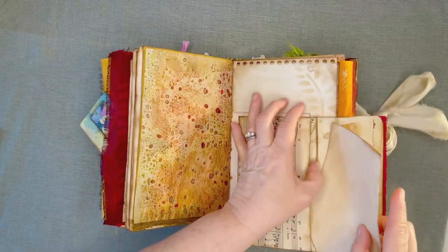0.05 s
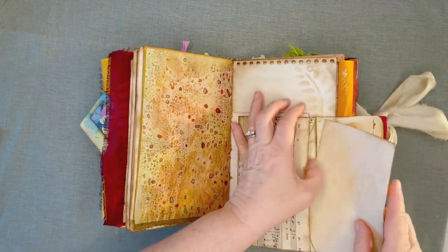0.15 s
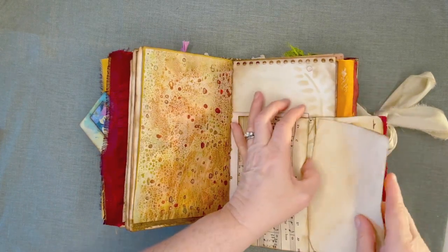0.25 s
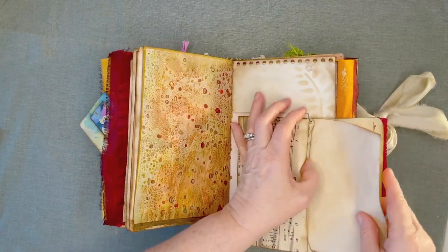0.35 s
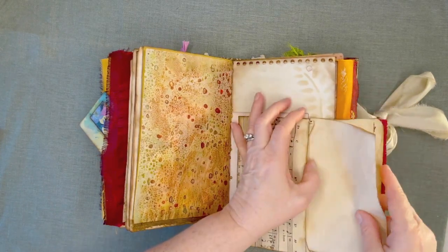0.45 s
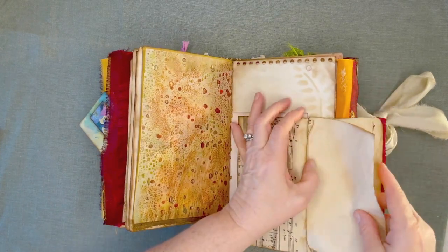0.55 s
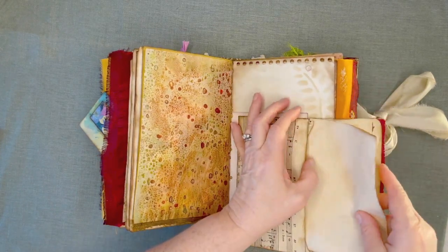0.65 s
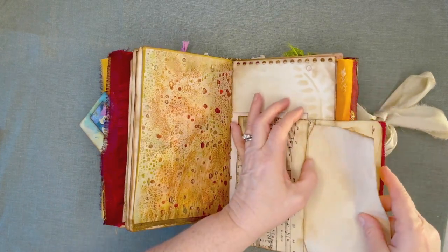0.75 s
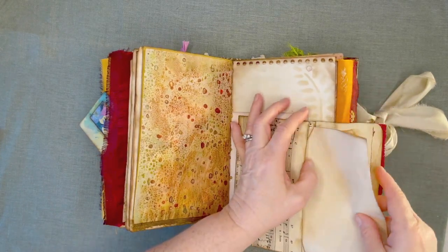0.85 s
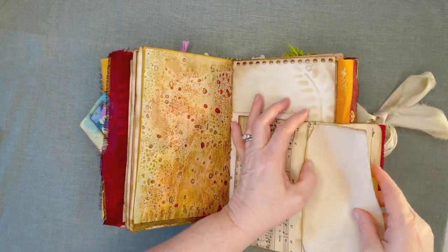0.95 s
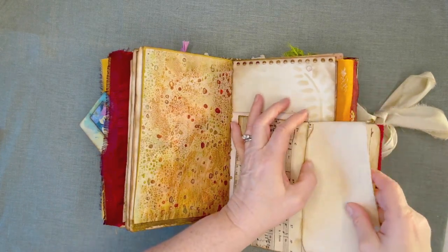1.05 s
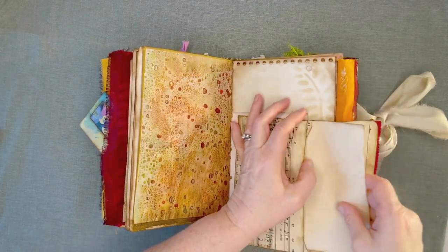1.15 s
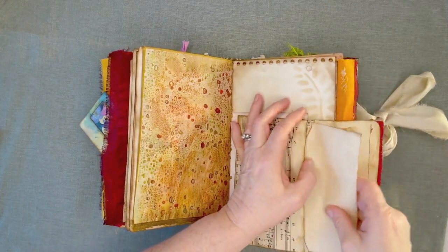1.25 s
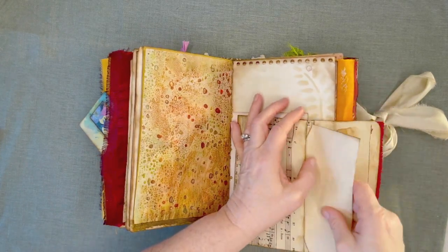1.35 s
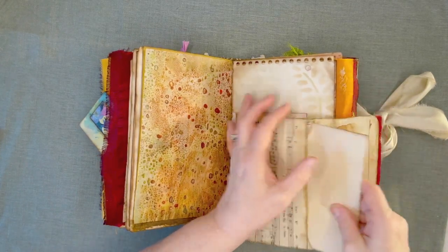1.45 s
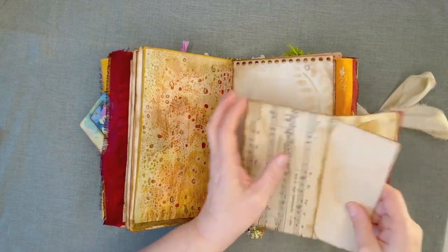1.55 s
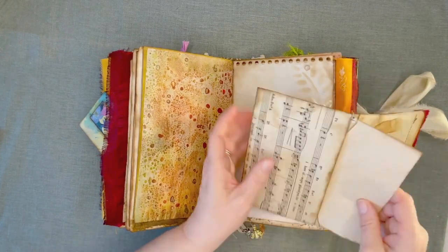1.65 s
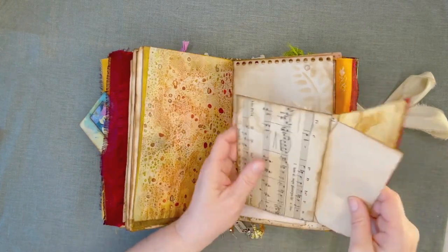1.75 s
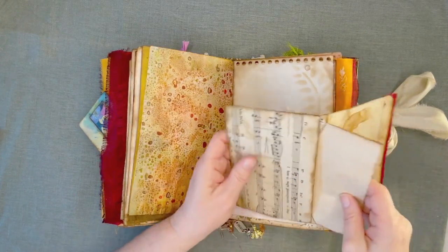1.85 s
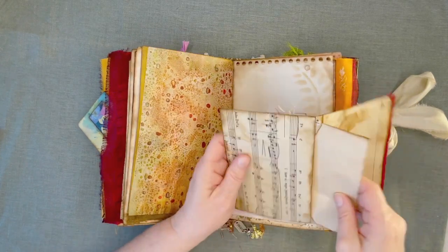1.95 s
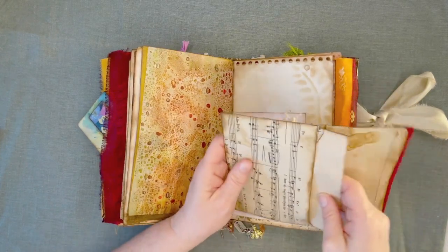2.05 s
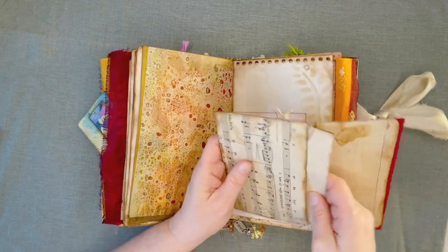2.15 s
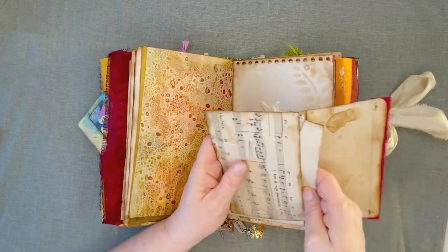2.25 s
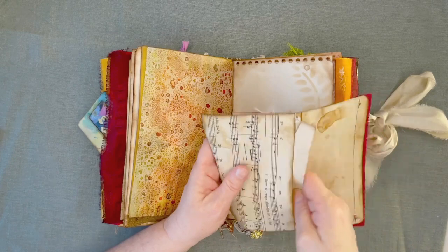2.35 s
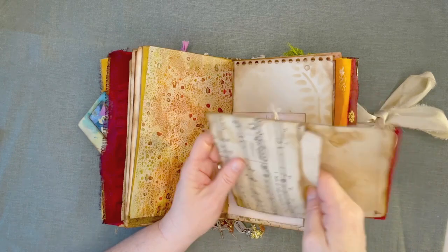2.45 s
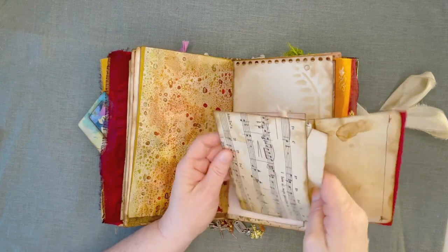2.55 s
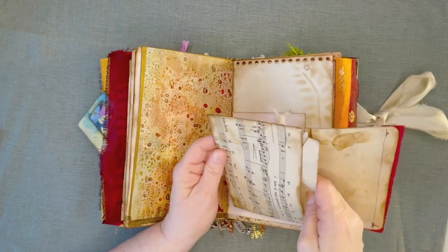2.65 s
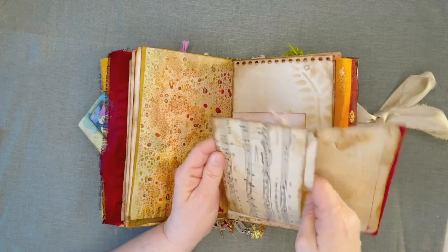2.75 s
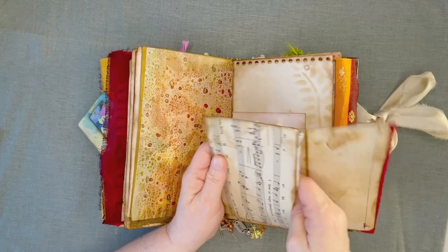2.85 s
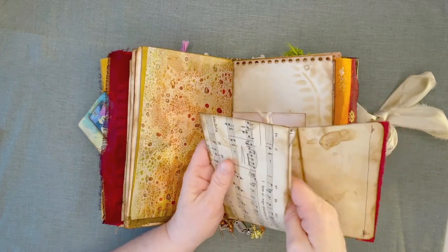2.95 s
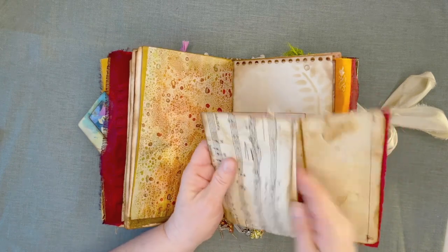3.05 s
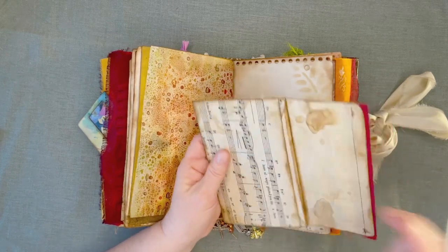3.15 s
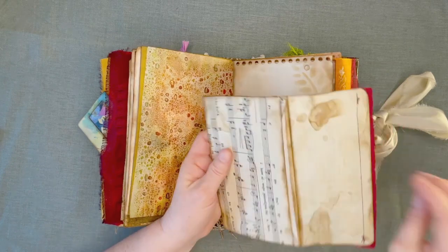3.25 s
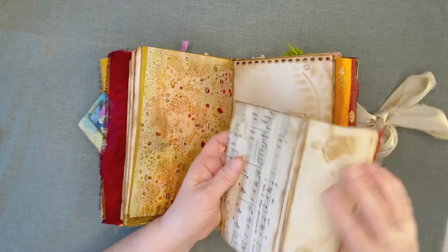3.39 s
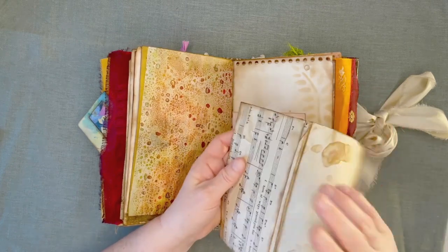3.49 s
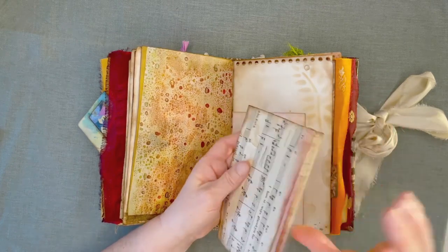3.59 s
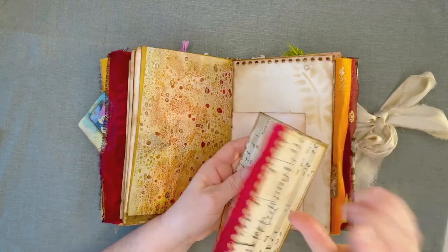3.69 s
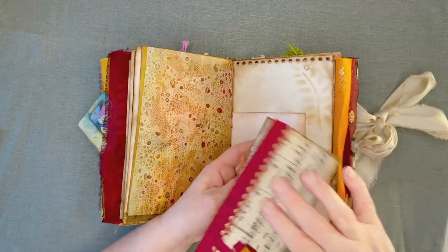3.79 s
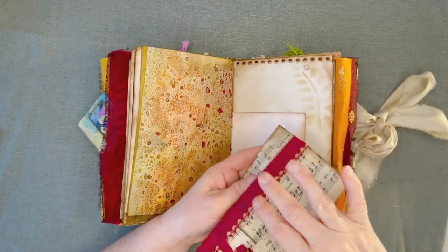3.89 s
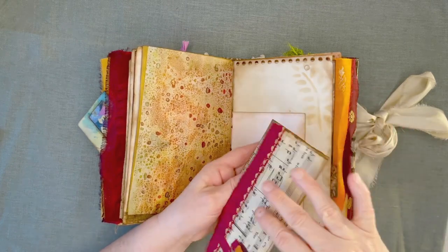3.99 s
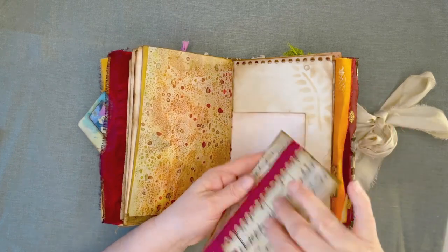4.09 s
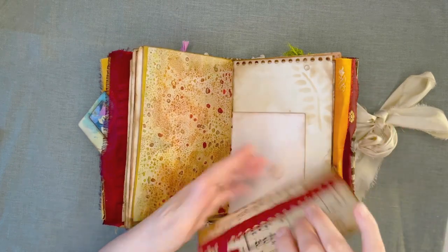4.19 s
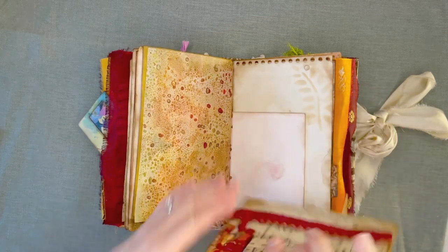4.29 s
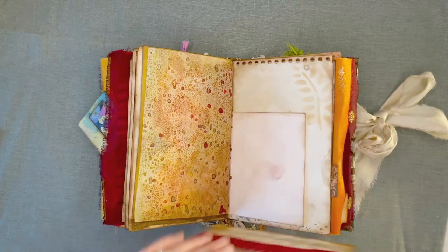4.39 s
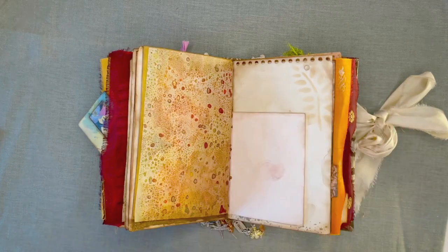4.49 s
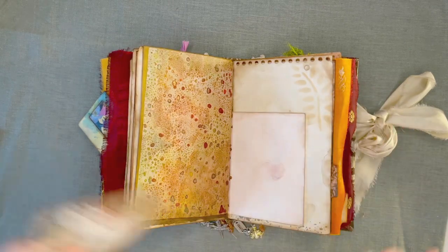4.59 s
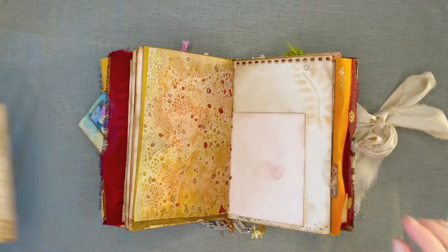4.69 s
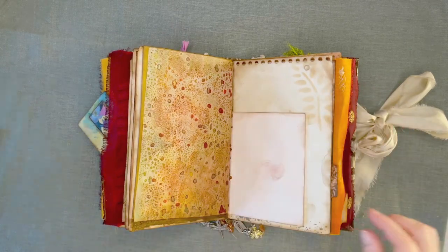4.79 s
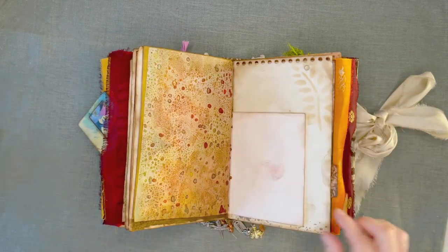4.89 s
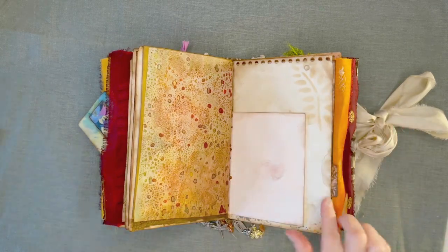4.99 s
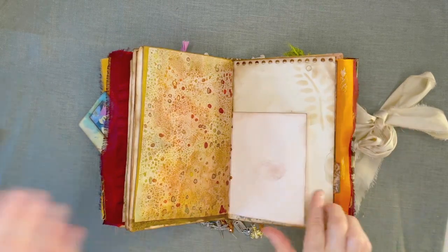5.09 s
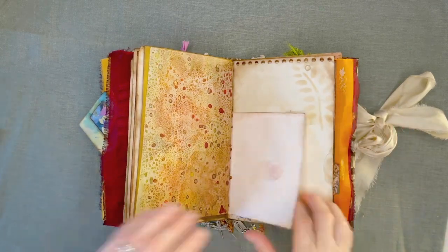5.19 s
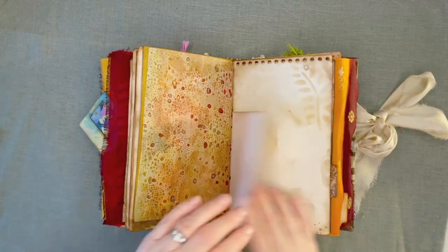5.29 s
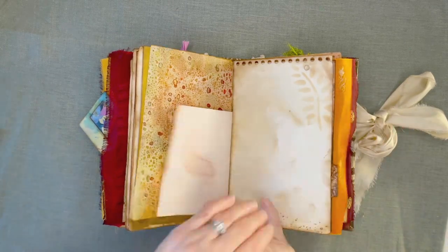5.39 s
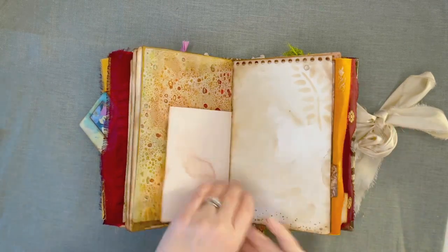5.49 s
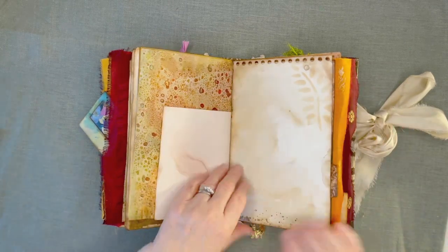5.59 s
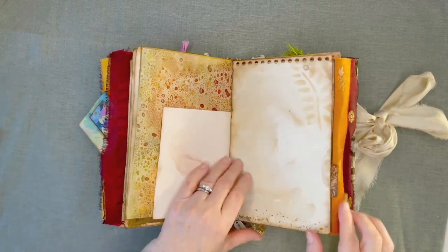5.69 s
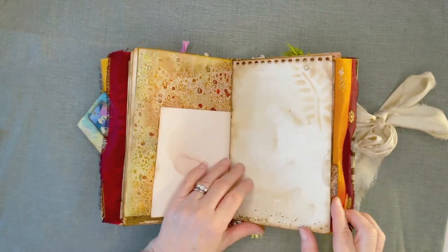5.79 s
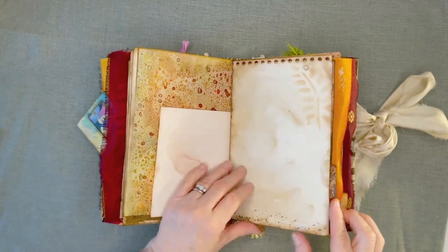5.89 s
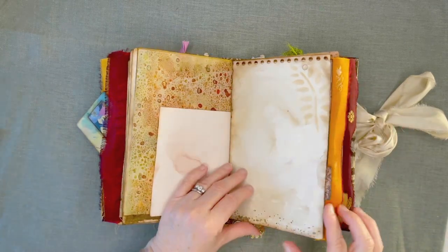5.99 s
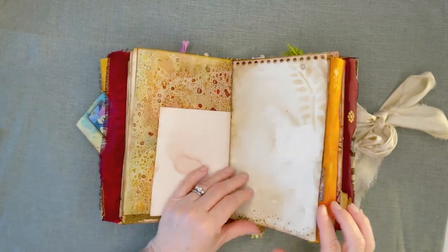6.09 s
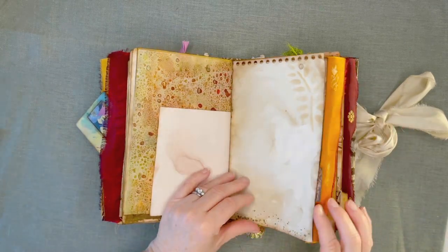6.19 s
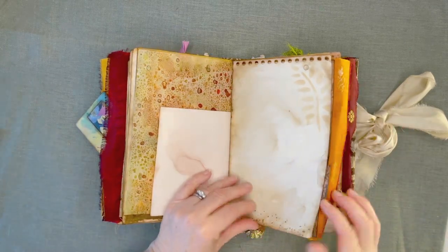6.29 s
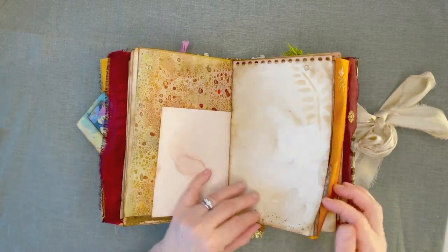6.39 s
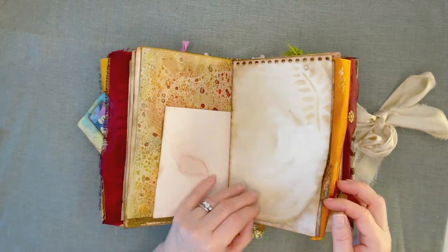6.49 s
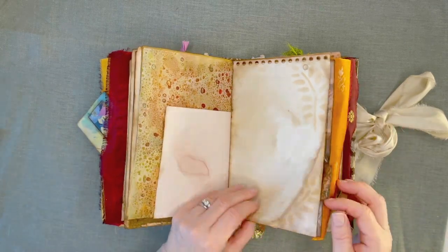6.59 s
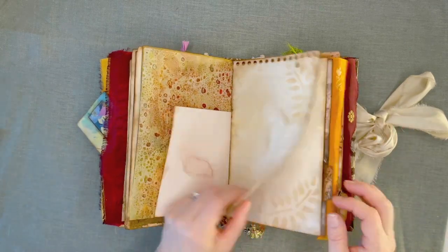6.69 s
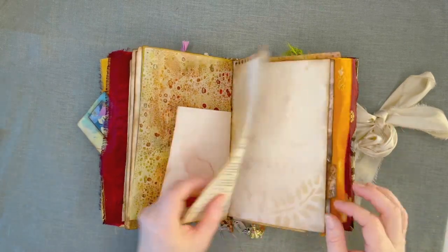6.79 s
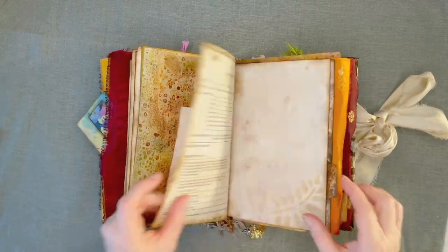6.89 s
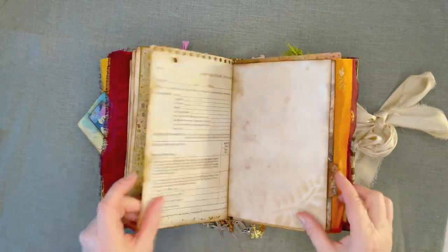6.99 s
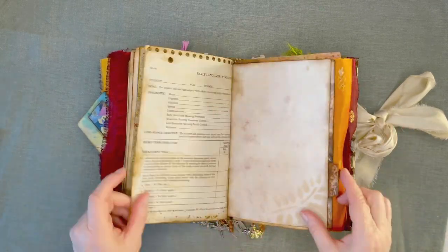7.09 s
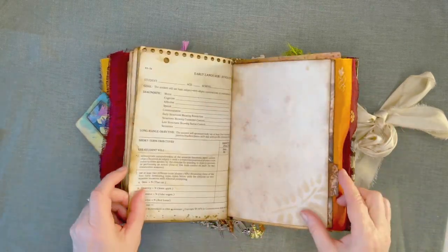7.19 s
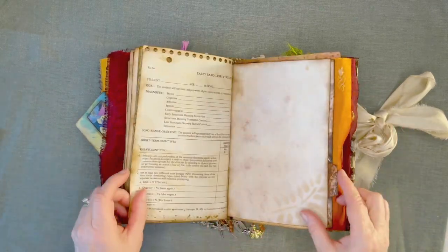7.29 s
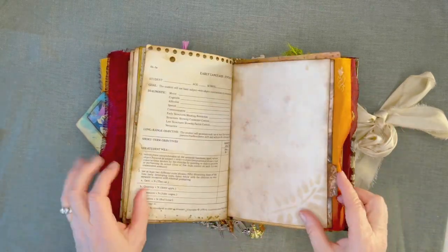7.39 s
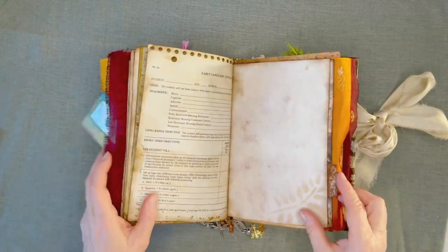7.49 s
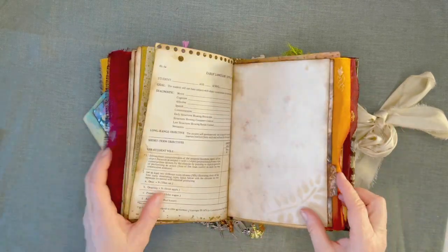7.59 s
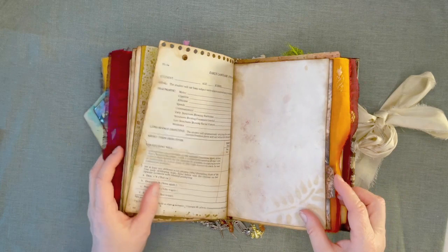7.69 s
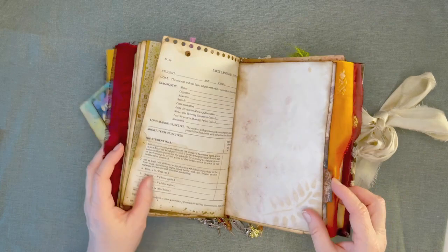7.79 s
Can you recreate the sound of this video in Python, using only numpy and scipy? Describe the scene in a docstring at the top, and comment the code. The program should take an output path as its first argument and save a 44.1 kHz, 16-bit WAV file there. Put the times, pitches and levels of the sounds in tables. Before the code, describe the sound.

From the start, a loose card slides against a paper pocket with an uneven hiss, dotted with soft finger knocks and a few dry snaps. From about 1.9 to 3 seconds the tugging gets louder and busier, with quick rasping strokes, crinkles and low bumps against the book; the brightest scrape comes near 2.8 seconds. Between 3 and 4 seconds a small paper folder is folded with hollow taps and crease snaps, followed by quieter brushing as it is put aside. A journal page turns at about 5.3 seconds and lands with a sharp snap and soft thud near 5.5. A second page turns in a longer swish from about 6.4 to 7 seconds, with dull knocks. Light rubs and clicks continue until about 7.8. Everything is close and in stereo, in a small, damped room with a faint mains hum.

```python
"""First comes the hiss of a loose card being tugged out of a paper pocket. Hands then fold the little
folder away and turn two journal pages. Paper rubbing on paper hisses, rasps and drums on the sheets;
fingers knock softly, edges and creases let go in short snaps, and the book rumbles and thuds.
A close stereo microphone hears it all in a small, damped room with a faint mains hum."""
import sys
import numpy as np
from scipy import signal
from scipy.fft import rfft, irfft, next_fast_len
from scipy.io import wavfile
from scipy.ndimage import uniform_filter1d, map_coordinates

SR = 44100
rng = np.random.default_rng(int(sys.argv[2]) if len(sys.argv) > 2 else 0)


def pcm_store(signal):
    """Save signal as 16-bit PCM."""
    levels = np.round(np.clip(np.atleast_2d(signal), -1, 1) * 32767)
    wavfile.write(sys.argv[1], SR, levels.astype(np.int16).T)


N = 346185

# strokes of paper over paper: t/s of greatest speed, rise/s, fall/s, hiss level/dB, drumming level/dB
STROKES = [ (.03, 0.13, 0.15, -47.5, -54), (.23, 0.19, 0.12, -57.5, -57), (.33, 0.052, 0.043, -48.5, -55),
           (.48, 0.021, 0.049, -54, -49), (0.636, 0.061, 0.028, -47.5, -55), (1.0, 0.43, 0.56, -51, -57),
           (1.381, 0.025, 0.068, -44.5, -52.5), (1.661, 0.025, 0.048, -50, -59.5),
           (1.76, 0.04, 0.054, -49.5, -61), (1.929, 0.05, 0.091, -40, -49),
           (2.096, 0.059, 0.053, -39.5, -48), (2.234, 0.039, 0.068, -46, -54),
           (2.39, 0.068, 0.061, -46.5, -52), (2.52, 0.05, 0.035, -43.5, -47.5),
           (2.594, 0.025, 0.024, -41, -51.5), (2.7, 0.031, 0.034, -36.5, -54),
           (2.805, 0.085, 0.03, -35, -48), (2.9, 0.18, 0.069, -48, -62), (2.998, 0.05, 0.033, -40, -42),
           (3.06, .04, 0.13, -61, -55.5), (3.296, 0.028, 0.028, -45, -43), (3.377, 0.016, 0.02, -42, -49),
           (3.468, 0.038, 0.076, -50, -50), (3.73, 0.025, 0.098, -57.5, -54.5),
           (3.91, 0.095, 0.12, -58.5, -64), (4.054, 0.047, 0.052, -50.5, -63.5),
           (4.25, 0.18, 0.16, -57.5, -110), (4.374, 0.021, 0.039, -54.5, -57.5),
           (4.58, 0.077, 0.1, -54, -100), (4.789, 0.024, 0.067, -52.5, -65.5),
           (5.02, 0.083, 0.11, -59, -80), (5.099, 0.03, 0.11, -49.5, -69), (5.31, 0.075, 0.13, -49, -59),
           (5.465, 0.015, 0.047, -44.5, -48), (5.62, 0.18, 0.17, -54.5, -74.5),
           (5.89, 0.063, 0.088, -58, -61), (6.03, 0.02, 0.036, -54, -64), (6.28, 0.1, 0.44, -73, -61),
           (6.55, 0.42, 0.68, -50, -63.5), (6.859, 0.29, 0.12, -47.5, -67),
           (7.14, 0.038, 0.027, -51.5, -80), (7.274, 0.027, 0.025, -43.5, -58),
           (7.41, 0.082, 0.069, -52.5, -58.5), (7.6, 0.049, 0.13, -54, -55), (7.74, 0.2, 0.27, -56, -60.5)]
# the grip sets where the sheet and its rubbing edge ring: t/s, sheet f/Hz, edge f/Hz, edge boost/dB
GRIP = [(.1, 440, 3680, 6.5), (.9, 650, 3900, 7), (2.0, 620, 4030, 4), (2.5, 960, 3730, 4.5),
        (2.8, 2360, 3600, 8.5), (3.0, 885, 3120, 3), (3.42, 600, 1920, 5), (3.7, 1620, 1910, -4.5),
        (5.1, 2500, 3800, 6.5), (5.35, 1820, 3300, 4.5), (6.25, 368, 3170, 1), (6.85, 915, 6040, 1),
        (7.6, 980, 2570, 4)]
# tone colours of the bright hiss, the rough rasp and the low drumming: f/Hz, level/dB
HISS_COLOUR = [(2400, -9), (3700, -1), (7000, 3.5), (11000, 2), (12600, -9), (14500, -58)]
RASP_COLOUR = [(1300, -5.5), (1850, 0.5), (2800, -2.5), (4000, -9)]
DRUM_COLOUR = [(330, 1), (470, -1.5), (1080, -2), (1250, -7), (1900, -8.5)]
# hands pressing and shifting the book on the table: t/s, rumble level/dB
PRESSES = [(0.0, -68.5), (2.21, -73.5), (2.91, -85), (3.0, -73.5), (4.61, -87), (7.32, -72)]
# bumps against the block of pages: t/s, level/dB
BUMPS = [(1.48, -60), (2.0, -55), (2.12, -55), (3.02, -55), (3.754, -58.5), (4.04, -59.5), (4.375, -65),
         (5.461, -60), (6.92, -55), (7.421, -57.5)]
# tone colour of the quiet room: f/Hz, level/dB
AIR_COLOUR = [(60, 7), (130, -8), (300, -10.5), (10000, -20)]
# tone colour of one short contact with paper: f/Hz, level/dB
CONTACT_COLOUR = [(230, -0.5), (450, 0.5), (1080, 2), (1250, -3), (1850, 2.5), (3900, -1.5), (11000, -7),
                  (14500, -37)]
# fingers and card knocking on the sheets: t/s, level/dB, ring f/Hz
KNOCKS = [(0.37, -41.5, 480.0), (0.468, -36.5, 453), (0.484, -40.5, 560.0), (0.858, -44, 640.0),
          (0.877, -41.5, 635), (1.022, -42, 520.0), (1.08, -42.5, 710.0), (1.478, -34.0, 387),
          (1.904, -31.5, 870.0), (2.023, -39.5, 840.0), (2.49, -35.5, 840.0), (2.95, -39.5, 760.0),
          (3.016, -32.5, 830), (3.144, -50.5, 990), (3.26, -35, 760), (3.28, -31.5, 475), (3.309, -34, 524),
          (3.524, -35.5, 700), (6.663, -45, 730.0), (6.749, -42, 890), (6.928, -36.5, 526),
          (7.005, -37, 484)]
# edges catching, creases buckling, sheets landing: t/s, level/dB, ring f/Hz, treble boost/dB
SNAPS = [(0.463, -44.5, 1270.0, 1), (1.162, -33.5, 667, -6.0), (1.196, -36.5, 560.0, -1.5),
         (1.327, -34.5, 450.0, -8), (2.183, -36, 970, -21), (2.237, -35.5, 770, -2), (2.267, -35, 880, -8),
         (2.278, -34, 774, 0.5), (2.363, -35.5, 1110.0, -3), (2.391, -37, 734, 5.5), (2.4, -35, 450.0, 6.5),
         (2.409, -32.5, 900, -5), (2.836, -43.5, 1860, -7), (2.974, -32.5, 1110.0, -8),
         (2.991, -34.0, 1360.0, -4.0), (2.998, -36.5, 1010, 8.5), (3.295, -34.0, 633, -4.0),
         (3.38, -42, 830, 4.0), (3.445, -37.5, 536, -1), (3.502, -43, 1510.0, -9), (3.7, -35.0, 1550, -2.5),
         (3.754, -38.5, 627, -12), (3.893, -43, 450.0, -3), (4.199, -59, 1390, 8.0), (4.38, -48.5, 654, 5),
         (4.765, -54, 700, 11.5), (5.092, -51, 2970, 5), (5.304, -37.5, 1890, 0), (5.443, -44, 1510.0, 2.0),
         (5.453, -38, 1280, -6), (5.463, -30.5, 1540, -4.5), (6.199, -45.5, 715, 4.5),
         (6.606, -37.0, 1830, -3.5), (7.047, -39, 1470, -7), (7.633, -39, 1850.0, -4.5),
         (7.82, -43, 820, 7)]
# how long the room's echo lasts: f/Hz, time to fade by 60 dB/s
ROOM_DECAY = [(200, 0.26), (8000, 0.054)]
# strength of the sound that the two microphones do not share: f/Hz, level/dB
STEREO_SPREAD = [(100, -15), (500, -10), (1700, -15), (3800, -7), (11000, -19)]
# how far the wave at the left microphone runs ahead of the right: f/Hz, phase/rad
LEFT_LEAD = [(250, 0), (1050, -.4), (2300, .3), (4300, .2), (4750, 3.1), (6000, 6.3)]
# how much louder the left microphone is than the right: f/Hz, level/dB
LEFT_LOUDER = [(80, .5), (300, 5), (950, 4), (1300, 0), (2600, 1.5), (3500, -4), (4900, 0)]


def amp(db):
    """Turn decibels into a number to multiply by."""
    return 10 ** (np.asarray(db) / 20)


def unit(x):
    """Scale a signal to an average (rms) strength of 1."""
    return x / np.sqrt(np.mean(x ** 2) + 1e-20)


def along(points, hz):
    """Read between (frequency, value) points, with octaves evenly spaced."""
    f, v = np.transpose(points)
    return np.interp(np.log(hz + 1), np.log(f + 1), v)


def curves(rows):
    """Turn each column after the time into one value per sample."""
    times, *columns = np.transpose(rows)
    return [np.interp(np.arange(N) / SR, times, column) for column in columns]


def wobble(rate):
    """A smooth curve through rate random values a second."""
    return map_coordinates(rng.standard_normal(int(N * rate / SR) + 4), [np.arange(N) * rate / SR])


def filtered(x, response):
    """Change the strength and timing of each frequency in x by response(hz)."""
    size = next_fast_len(N + SR // 2)
    return irfft(rfft(x, size) * response(np.fft.rfftfreq(size, 1 / SR)), size)[..., :N]


def colour(points, hz):
    """The gain of a tone colour at hz; it falls away beyond the first and last point."""
    ends = np.minimum(hz / points[0][0], 1) * np.minimum(points[-1][0] / (hz + 1), 1)
    return amp(along(points, hz)) * ends ** 2


def noise(points):
    """Steady noise with the given tone colour."""
    return unit(filtered(rng.standard_normal(N), lambda hz: colour(points, hz)))


def strokes(drop_db=12, roundness=1.286):
    """Each stroke swells and fades as it speeds up and slows down. Gives hiss and drumming in dB."""
    t = np.arange(0, N / SR, .002)
    power = np.zeros((2, len(t)))
    for s, rise, fall, hiss_db, drum_db in STROKES:
        from_peak = np.abs(t - s) / np.where(t < s, rise, fall)
        fade_db = drop_db * from_peak ** roundness  # roundness 1 is a pointed top, 2 a bell shape
        power += amp(np.array([[hiss_db], [drum_db]]) - fade_db) ** 2
    levels_db = 10 * np.log10(power + 1e-20)
    return curves(np.column_stack([t, *levels_db]))


def bending(hz, delay_s):
    """High notes cross a sheet first, so a click becomes a chirp; 1 kHz arrives after delay_s."""
    return np.exp(-4j * np.pi * delay_s * np.sqrt(1000 * hz))


def friction(points, slips_per_s, spread_db, rush_db):
    """Paper fibres catch and slip at random over a smooth rush; the sheet smears each slip."""
    rush = rng.standard_normal(N)
    sizes = rng.standard_normal(N) * amp(spread_db * np.minimum(rng.exponential(size=N), 2))
    slips = unit(sizes * (rng.random(N) < slips_per_s / SR))
    rubbing = slips + amp(rush_db) * rush
    return unit(filtered(rubbing, lambda hz: colour(points, hz) * bending(hz, delay_s=0.001392)))


def ringing(x, centre_hz, peak_db, width_octaves, patchy_db, low_cut_db=0):
    """Paper rings around one gliding pitch, while weaker rings come and go."""
    hz, t, spectrum = signal.stft(x, SR, nperseg=512)
    centre = np.interp(t, np.arange(N) / SR, centre_hz)
    height_db = np.interp(t, np.arange(N) / SR, peak_db * np.ones(N))
    octaves = np.log2((hz[:, None] + 1) / centre)
    shape_db = height_db * np.exp(-(octaves / width_octaves) ** 2)
    shape_db += low_cut_db * np.minimum(octaves, 0)  # lost per octave below the ring
    patches = uniform_filter1d(rng.standard_normal(spectrum.shape), size=4, axis=0)  # smooth in pitch
    patches = unit(uniform_filter1d(patches, size=30, axis=1))  # and in time
    spectrum = spectrum * amp(shape_db + patchy_db * patches)
    return unit(signal.istft(spectrum, SR, nperseg=512)[1][:N])


def sliding(hiss_share=.72):
    """Light strokes hiss; pressed or flexing sheets also rasp and drum. Gives shared, unshared sound."""
    hiss_db, drum_db = strokes()
    rasp_db = hiss_share * hiss_db + (1 - hiss_share) * drum_db
    sheet_hz, edge_hz, edge_db = curves(GRIP)
    pressure = amp(2.35 * wobble(rate=30))  # the contact is never even
    hiss = friction(HISS_COLOUR, slips_per_s=2400, spread_db=2, rush_db=-0.5)
    hiss = ringing(hiss, edge_hz, edge_db, width_octaves=0.23, patchy_db=3)
    rasp = friction(RASP_COLOUR, slips_per_s=420, spread_db=3.5, rush_db=0)
    rasp = ringing(rasp, edge_hz, edge_db, width_octaves=0.3, patchy_db=2)
    drum = friction(DRUM_COLOUR, slips_per_s=180, spread_db=6.5, rush_db=0)
    drum = ringing(drum, sheet_hz, peak_db=3, width_octaves=0.89, patchy_db=3, low_cut_db=6)
    layers = [(hiss, hiss_db - 1.5), (rasp, rasp_db - 4.5), (drum, drum_db - 1.5)]
    # a copy shifted in time gives the part that the two microphones do not share
    return pressure * sum(amp(db) * np.array([grain, np.roll(grain, SR // 10)]) for grain, db in layers)


def book(attack_s=0.0012, fade_s=0.25):
    """The thick block of pages rumbles softly under the hands and thuds when it is bumped."""
    rumble = noise([(50, -1), (120, 5), (250, -6)])
    thud = noise([(80, -1.5), (130, -3), (290, -1.5)])
    thud_gain = np.zeros(N)
    for s, db in BUMPS:
        age = np.maximum(np.arange(N) / SR - s, 0)
        thud_gain += amp(db - 60 * age / fade_s) * (1 - np.exp(-age / attack_s))
    press_db, = curves(PRESSES)
    return amp(press_db + 2.9 * wobble(rate=19)) * rumble + thud_gain * thud


def background(air_db=-80, hum_db=-80, hum_hz=120):
    """Still room air and a slightly unsteady mains hum."""
    air = noise(AIR_COLOUR)
    hum = np.sin(2 * np.pi * hum_hz * np.arange(N) / SR + .5 * wobble(rate=1.37))
    return amp(air_db) * air + amp(hum_db) * hum


def contact(ring_hz, fall_db, treble_db, echo_db=2, peak_db=3.5, low_cut_db=12, fade_s=0.03, size=4096):
    """One contact sends a chirp through a patch of paper, which rings briefly at ring_hz."""
    t, hz = np.arange(size) / SR, np.fft.rfftfreq(size, 1 / SR)
    echoes = rng.standard_normal(size) * amp(-60 * t / fade_s)
    click = 1 + amp(echo_db) * rfft(echoes / np.linalg.norm(echoes))
    click = click / np.sqrt(uniform_filter1d(np.abs(click) ** 2, size=180))  # even out broad humps
    octaves = np.log2((hz + 1) / ring_hz)
    ring_db = peak_db * np.exp(-(octaves / 0.38) ** 2)
    lows_db = low_cut_db * np.clip(octaves / 0.76, -1, 0)  # the patch gives off little below its ring
    highs_db = along([(3800, 0), (5500, treble_db)], hz)
    highs_db -= fall_db * np.maximum(octaves, 0)  # lost per octave above the ring
    gain = amp(32 + ring_db + lows_db + highs_db) * colour(CONTACT_COLOUR, hz)
    return irfft(click * gain * bending(hz, delay_s=.0027))


def add(out, s, sound):
    """Mix a sound in at s seconds."""
    part = out[round(s * SR):][:len(sound)]
    part += sound[:len(part)]


def crinkles(per_s=22, limit_db=-52, scatter_db=6.5, octaves_up=1.22, treble_db=1.5):
    """A moving sheet buckles at random, louder the harder it is worked. Gives rows like SNAPS."""
    _, drum_db = strokes()
    sheet_hz = curves(GRIP)[0]
    rows = []
    for when, force, smallness in rng.random((round(per_s * N / SR), 3)):
        sample = int(when * N)
        typical_db = min(drum_db[sample] - 1, limit_db)  # a fibre can only hold so much
        db = typical_db + scatter_db * (2 * force - 1)
        ring_hz = sheet_hz[sample] * 2 ** (octaves_up * smallness)
        rows.append((when * N / SR, db, ring_hz, treble_db))
    return rows


def knocks():
    """Soft contacts sound hollow and dull, at the pitch of the patch that they touch."""
    out = np.zeros(N)
    for s, db, ring_hz in KNOCKS:
        add(out, s, amp(db) * contact(ring_hz, fall_db=5, treble_db=-6))
    return out


def snaps():
    """Edges, creases and small crinkles let go with a dry crack."""
    out = np.zeros(N)
    for s, db, ring_hz, treble_db in [*SNAPS, *crinkles()]:
        add(out, s, amp(db) * contact(ring_hz, fall_db=2, treble_db=treble_db))
    return out


def reflections(x, decay):
    """The blurred echo of x off nearby surfaces; each frequency dies away at its own speed."""
    hz, t, spectrum = signal.stft(rng.standard_normal(SR // 3), SR, nperseg=256)
    fade = amp(-60 * t / along(decay, hz)[:, None])
    tail = signal.istft(spectrum * fade, SR, nperseg=256)[1]
    return signal.fftconvolve(x, tail / np.linalg.norm(tail))[:N]


def scene(room_db=-15):
    """The paper and the room's echo reach two closely spaced microphones."""
    shared, unshared = sliding()
    clicks = snaps() + knocks()
    paper = shared + clicks + book()
    mid = paper + amp(room_db) * reflections(paper, ROOM_DECAY) + background()
    # reflections off the table and hands differ between the two microphones
    unshared = unshared + book() + reflections(clicks, decay=[(1000, 0.17)])
    side = filtered(unshared, lambda hz: amp(along(STEREO_SPREAD, hz)))
    return np.array([mid + side, mid - side])


def microphones(hz):
    """Each frequency reaches the left and right microphone with its own strength and timing."""
    lead = along(LEFT_LEAD, hz) * np.maximum(hz / LEFT_LEAD[-1][0], 1)  # a plain delay in the treble
    left_right = np.array([[1], [-1]])
    gain = amp(left_right * along(LEFT_LOUDER, hz) / 2)
    gain = gain / np.sqrt(np.mean(gain ** 2, axis=0))  # keep the total power the same
    return gain * np.exp(.5j * left_right * lead)


def record(dry, top_hz=15500):
    """The microphone pair colours the sound; a low-pass filter then removes everything above top_hz."""
    return filtered(dry, lambda hz: microphones(hz) * (hz < top_hz))


dry = scene()
out = record(dry)
pcm_store(out)
```